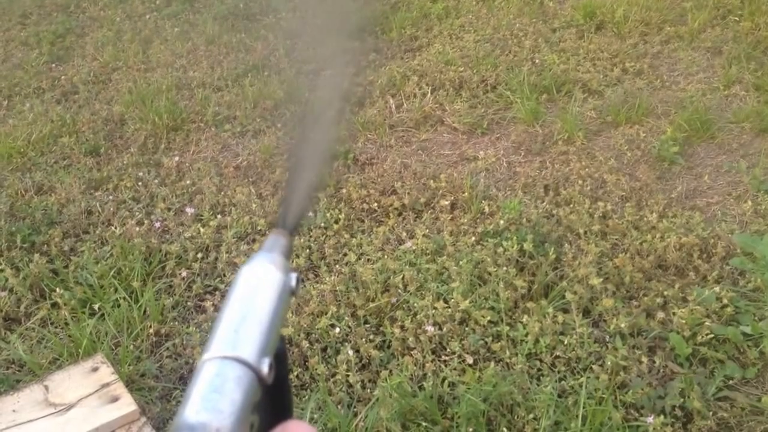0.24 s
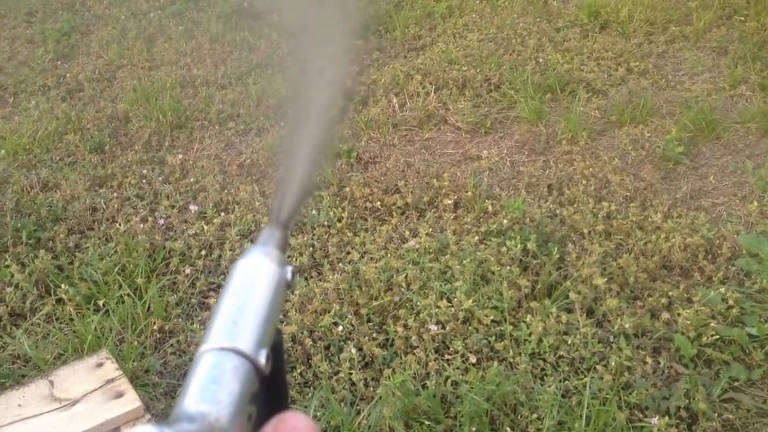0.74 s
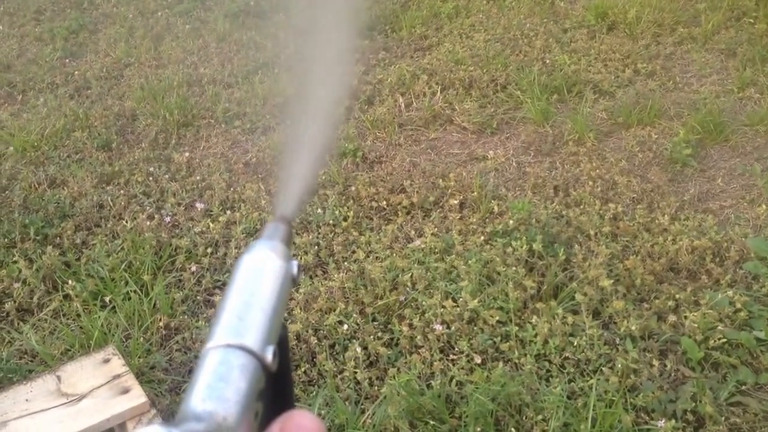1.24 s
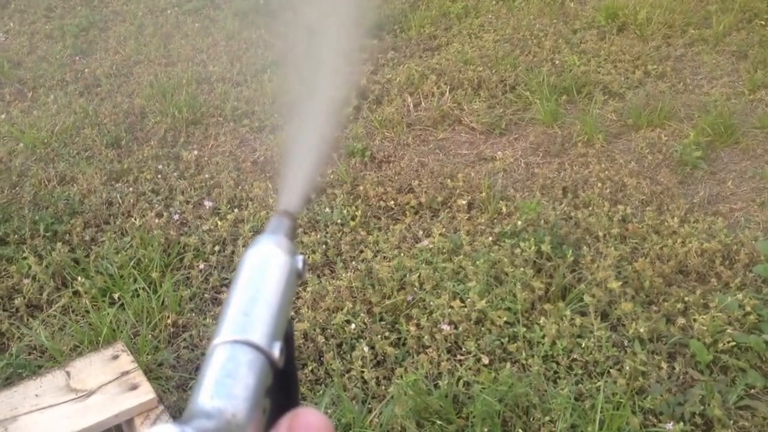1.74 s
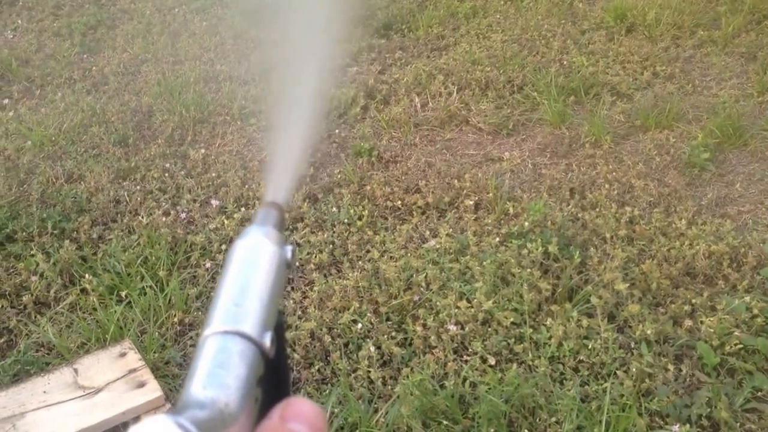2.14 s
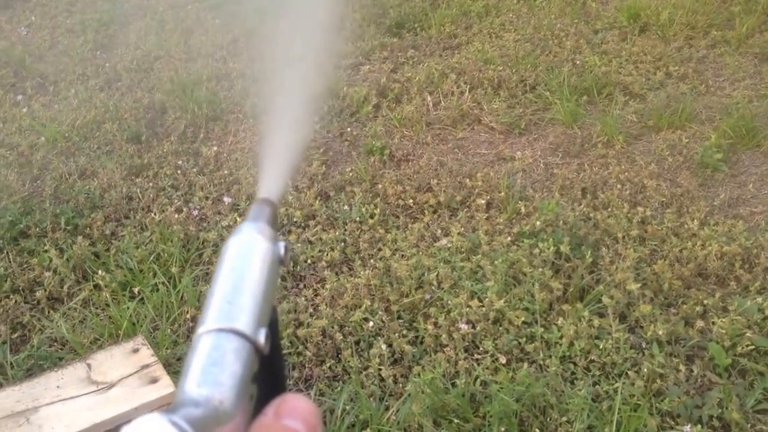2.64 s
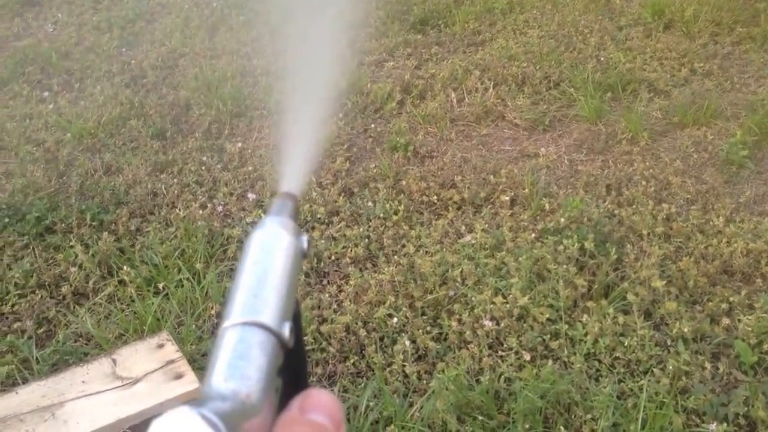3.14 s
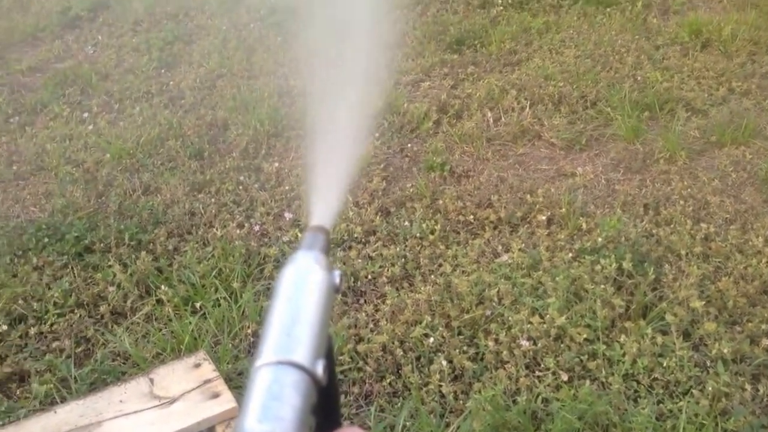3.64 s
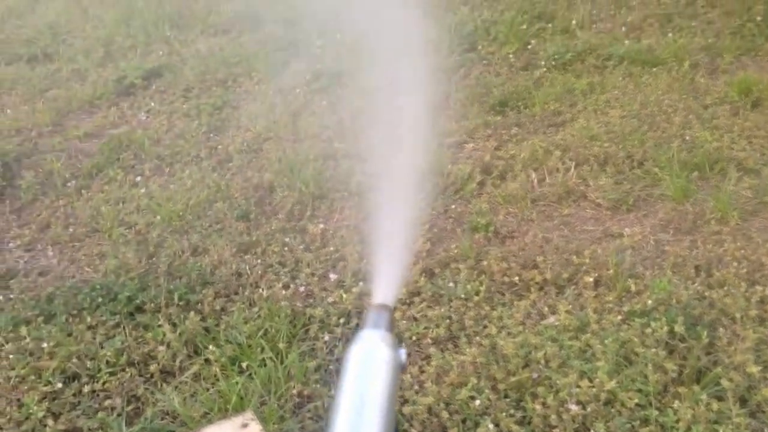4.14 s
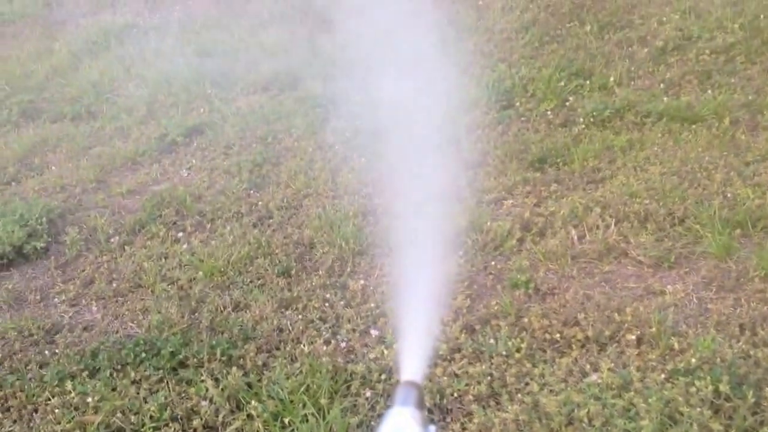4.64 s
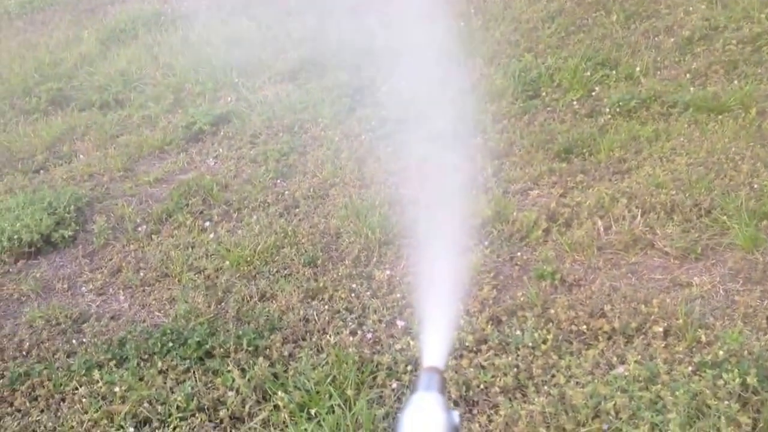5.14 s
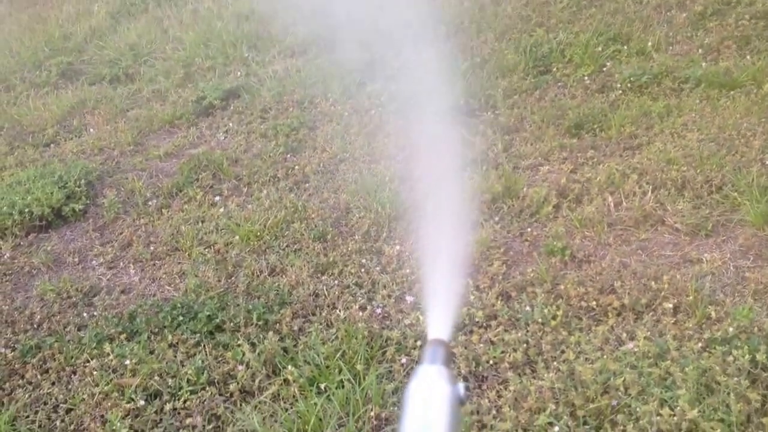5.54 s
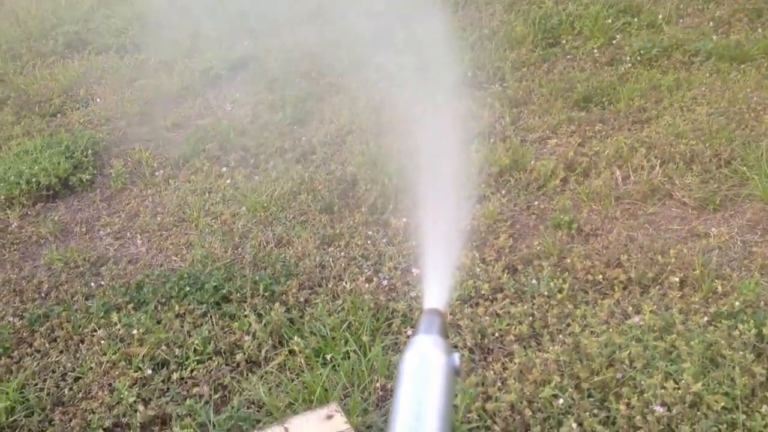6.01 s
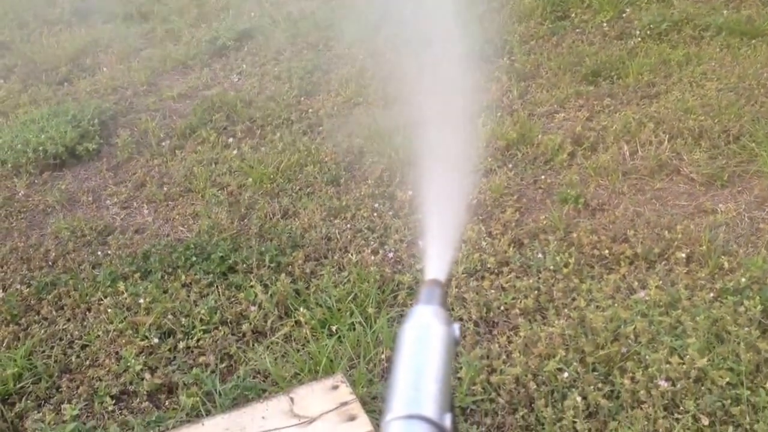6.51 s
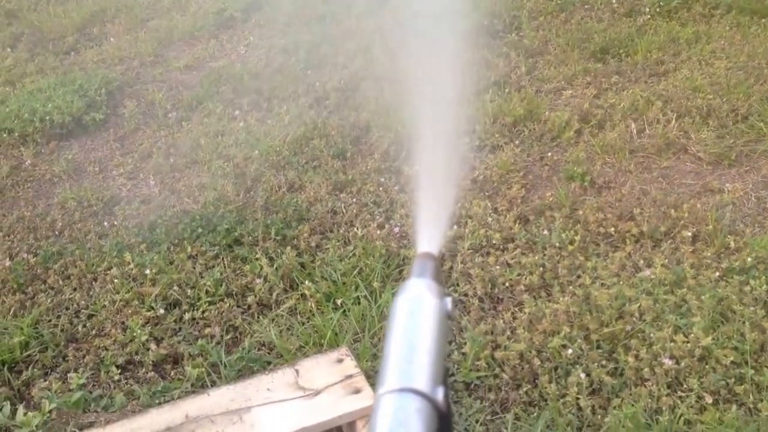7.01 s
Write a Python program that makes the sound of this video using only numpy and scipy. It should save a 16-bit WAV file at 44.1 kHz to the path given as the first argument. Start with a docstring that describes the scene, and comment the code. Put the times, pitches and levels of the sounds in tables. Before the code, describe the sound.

A hand-held spray gun blasts compressed air and water over a lawn, close to the microphone. The loud, bright hiss runs without a break, carrying a fuzzy high whistle, a softer rushing roar and a fine sputter. Small gulps of water pop out now and then, mostly in the first half. The tone shifts slightly midway as the gun moves forward, and faint puffs of air bump the microphone.

```python
"""On a lawn, close to the microphone, a hand-held spray gun blasts compressed air and soapy water. One uneven
flow builds up and sags again. It drives the hiss and roar of swirling air, a fuzzy nozzle whistle and the
sputter of torn-up water, while bigger blobs of water leave with a gulp. Echoes off nearby surfaces colour the
sound and change as the gun is pushed forward. Stray air bumps the microphone. Under it all lies the jet's
faint, steady low rumble."""
import sys
import numpy as np
from scipy import signal
from scipy.fft import irfft, next_fast_len
from scipy.io import wavfile
from scipy.ndimage import map_coordinates

SR = 44100
rng = np.random.default_rng(int(sys.argv[2]) if len(sys.argv) > 2 else 0)


def wav_record(signal):
    """Record a signal, one row per channel, as 16-bit PCM in the file named by sys.argv[1]."""
    frames = np.transpose(np.atleast_2d(signal))
    bounded = np.clip(frames, -1, 1)
    # unit amplitude maps onto the largest positive 16-bit level
    quanta = np.round(bounded * 32767).astype(np.int16)
    wavfile.write(sys.argv[1], SR, quanta)


N = 320607
TIME = np.arange(N) / SR

# The flow through the nozzle builds slowly and sags quickly: t/s, level/dB
JET_FLOW = [(0.0, -17.5), (0.14, -17), (0.34, -18.5), (1.28, -16.9), (1.32, -18.5), (1.82, -18.0),
            (1.92, -17.5), (2.02, -18.5), (2.32, -16.5), (2.76, -18.5), (2.98, -16.5), (3.1, -18),
            (3.86, -17), (3.92, -20), (4.02, -18.5), (4.74, -17.6), (4.86, -19), (5.64, -17.0), (5.82, -19),
            (6.02, -17), (6.12, -20.5), (6.34, -18), (7.18, -17.5), (7.26, -18.5)]
# The nozzle whistle: t/s, f/Hz, level/dB compared with the flow
WHISTLE_NOTE = [(0, 5960, -8.5), (1.6, 5940, -8), (2.15, 6000, -7), (3.3, 5940, -5.5), (3.9, 5920, -7),
                (4.4, 5920, -8), (6.0, 5930, -8), (6.5, 5850, -9.5), (6.8, 5730, -8.5), (7.27, 5630, -8)]
# How far the gun is pushed forward: t/s, reach (0 = near, 1 = forward)
ARM_REACH = [(0, 0.13), (1.7, 0.21), (3.3, 0.3), (3.8, 0.27), (4.3, 0.7), (4.9, 1), (5.8, 0.8),
             (7.27, 0.75)]
# The tone of each sound, from bass to treble: f/Hz, relative level/dB
HISS_SPECTRUM = [(400, -61.5), (1200, -15), (3000, -15.5), (3700, -10), (4400, -5), (5000, -2),
                 (6000, -1.5), (7500, 0.76), (9500, -3.5), (11300, -2.5), (12400, 0), (13200, -0.9),
                 (14300, -1.5), (15300, -7.5)]  # tiny swirls of air
ROAR_SPECTRUM = [(60, -33), (250, -20.5), (360, -21), (480, -18.5), (600, -17), (730, -4.5), (1050, 1.5),
                 (1600, 1.5), (2500, 1.5), (4000, -4), (8000, -44)]  # larger swirls
SPIT_SPECTRUM = [(100, -38), (300, -24), (480, -3.5), (700, 0), (1100, 3.5), (2000, -6), (4000, -12.5),
                 (9000, -22), (15000, -44)]  # one bit of water
GULP_SPECTRUM = [(100, -34), (280, -27), (430, 0), (600, 5), (1000, -5), (2000, -10.5), (4000, -14),
                 (9000, -27), (15000, -32)]  # one blob of water
PUFF_SPECTRUM = [(20, -26), (50, -11), (90, -4), (170, -3), (250, -5.5), (360, -19), (900, -45)]  # air hitting the microphone
RUMBLE_SPECTRUM = [(20, -30), (40, -12), (62, 4), (90, 2.5), (160, -0.5), (270, 7), (400, -10), (800, -24)]  # the jet's low rumble
# The largest blobs of water: t/s, relative peak level/dB
BIG_BLOBS = [(0.243, -16), (0.254, -14), (0.549, -22), (0.762, -16), (0.926, -11.5), (1.075, -15),
             (1.527, -17), (1.707, -16), (2.388, -13.5), (3.296, -14.5), (3.591, -16), (3.836, -14),
             (5.53, -17), (5.827, -19), (5.846, -17)]
# The echo off the holder's body drifts as the hand moves: t/s, delay/ms
BODY_ECHO_DELAY = [(0, 2.974), (.9, 2.97), (1.9, 3.022), (3.9, 3.052), (5.4, 3.02), (7.27, 3.044)]
# Bands the gun's body lifts or dims: f/Hz, width/Hz, level/dB when near, level/dB when forward
GUN_BANDS = [(792, 116, 5.5, 4.5), (1047, 55, 4, 4), (1540, 66, 4, -1.5), (1804, 44, 9, -7),
             (1890, 31, -25, 4), (2007, 38, 1.5, 9), (2350, 49, 8.5, 8), (2402, 70, -8, -4.5),
             (2545, 73, 0.5, 7), (2686, 42, 5.5, 5.5), (2930, 150, -6, 6), (3150, 61, 4.5, -0.5),
             (3470, 49, 2, 1), (3785, 86, 6, -7.5), (4230, 170, 3.5, -2.5), (4620, 31, -2, 8.5),
             (13350, 480, 4, 3), (15100, 400, 3.5, 7.5)]
# Puffs of air on the microphone: t/s, level/dB, fade time/s, pitch factor
AIR_PUFFS = [(0.997, -39.5, .014, 1), (1.042, -43, .017, 1.1), (1.144, -48, .02, 1.1), (1.27, -56, .07, .7),
             (2.358, -46, 0.048, .85), (2.62, -46, .021, 0.75), (3.879, -45, 0.038, 1.5),
             (5.29, -47, .034, 0.63), (5.396, -53, .04, .6), (5.86, -59, .28, .52),
             (6.384, -38, .029, 1.17), (6.678, -38, .017, 0.86)]


def hiss(jet_db, flutter, trim_db=1.0, flutter_db=0.48):
    """Tiny swirls of air hiss at the nozzle, fluttering a little with the water in the stream."""
    return noise(HISS_SPECTRUM) * gain_of(jet_db + trim_db + flutter_db * flutter)


def whistle(jet_db, width_hz=330, jitter_hz=40, gap_hz=240, upper_db=-1.0):
    """Air sings two close notes at the nozzle's lip; passing water keeps shaking their pitch."""
    hz, strength_db = follow(WHISTLE_NOTE)
    hz = hz + jitter_hz * wander(rate_hz=140)
    notes = np.zeros(N)
    for note_hz, note_db in ((hz, 0), (hz + gap_hz, upper_db)):
        ringing = resonate(rng.standard_normal(N), note_hz, width_hz)
        notes += gain_of(note_db) * resonate(ringing, note_hz, width_hz)  # twice, for a purer note
    return unit_level(notes) * gain_of(jet_db + strength_db)


def roar(jet_db, flutter, trim_db=-16.0, flutter_db=0.72, billow_db=0.26, forward_db=0.2):
    """Larger swirls roar further out in the spray, which billows by itself."""
    reach, = follow(ARM_REACH)
    wobble_db = flutter_db * flutter + billow_db * wander(rate_hz=9.6)
    return noise(ROAR_SPECTRUM) * gain_of(jet_db + trim_db + wobble_db + forward_db * reach)


def sputter(jet_db, flutter, per_s=330, spread_db=3.5, trim_db=-18.5, clumping=.15, forward_db=-1.5):
    """Each bit of water torn apart by the air makes a sharp spike of pressure."""
    reach, = follow(ARM_REACH)
    pulse = impulse(SPIT_SPECTRUM, one_sided=.2)
    chance = per_s / SR * np.exp(clumping * flutter)
    sizes = gain_of(spread_db * np.minimum(rng.exponential(1, N), 2.5))
    hits = sizes * (rng.random(N) < chance)
    spits = signal.oaconvolve(hits, pulse, "same")
    return unit_level(spits) * gain_of(jet_db + trim_db + forward_db * reach)


def gulps(trim_db=-1.0, small_per_s=5, small_db=-19, spread_db=1.5, forward_db=-3):
    """Blobs of water take longer to leave the nozzle, so they sound deeper; small ones come at random."""
    reach, = follow(ARM_REACH)
    pulse = impulse(GULP_SPECTRUM, one_sided=.2)
    small_blobs = rng.random(N) < small_per_s / SR
    hits = small_blobs * gain_of(small_db + spread_db * rng.uniform(-1, 1, N) + forward_db * reach)
    for time_s, peak_db in BIG_BLOBS:
        add(hits, time_s, gain_of([peak_db]))
    return gain_of(trim_db) * signal.oaconvolve(hits, pulse / pulse.max(), "same")


def nearby_echoes(jet):
    """Quick echoes off the holder and the gun boost some pitches and weaken others as the arm moves."""
    reach, = follow(ARM_REACH)
    body_ms, = follow(BODY_ECHO_DELAY)
    near = 0.16 * echo(jet, body_ms, dull_hz=9000)
    off_gun = 0.17 * echo(jet, delay_ms=1.52, dull_hz=5000)
    forward = 0.17 * echo(jet, body_ms, dull_hz=3800) + off_gun
    return jet + (1 - reach) * near + reach * forward


def gun_shading(jet):
    """The gun's body lifts or dims bands of the sound, depending on how far the arm reaches."""
    hz, t, spectra = signal.stft(jet, SR, nperseg=1024)
    reach, = follow(ARM_REACH)
    reach = np.interp(t, TIME, reach)
    shade_db = 0
    for centre_hz, width_hz, near_db, forward_db in GUN_BANDS:
        band = np.exp(-((hz - centre_hz) / width_hz) ** 2)
        shade_db += np.outer(band, near_db + (forward_db - near_db) * reach)
    return signal.istft(spectra * gain_of(shade_db), SR, nperseg=1024)[1][:N]


def air_puffs():
    """Brief puffs of air bump the microphone; faster puffs sound higher."""
    mix = np.zeros(N)
    t = np.arange(SR // 2) / SR - 1 / 4  # half a second, centred on the puff
    for time_s, db, fade_s, pitch in AIR_PUFFS:
        pulse = impulse(np.multiply(PUFF_SPECTRUM, [pitch, 1]))
        swirls = signal.oaconvolve(rng.standard_normal(len(t)), pulse, "same")
        swell = np.exp(-2 * (t / fade_s) ** 2)
        puff = unit_level(swirls * swell) * np.sqrt(np.mean(swell ** 2))
        add(mix, time_s + t[0], gain_of(db) * puff)
    return mix


def jet_rumble(level_db=-61.0, drift_db=2.0):
    """The jet's faint low rumble; its level wavers a little."""
    return noise(RUMBLE_SPECTRUM) * gain_of(level_db + drift_db * wander(rate_hz=6.6))


def gain_of(db):
    """Turns decibels into a number to multiply a sound by."""
    return 10 ** (np.asarray(db) / 20)


def unit_level(x):
    """Scales a signal so that its average size (rms) is 1."""
    return x / np.sqrt(np.mean(x ** 2) + 1e-20)


def follow(table):
    """Joins a table's points in time with straight lines, giving one curve per value column."""
    times, *columns = np.transpose(table)
    return [np.interp(TIME, times, column) for column in columns]


def add(mix, start_s, sound):
    """Lays a sound into the mix at the given time."""
    part = mix[max(round(start_s * SR), 0):][:len(sound)]
    part += sound[:len(part)]


def impulse(spectrum, one_sided=1, size=4096):
    """A centred click with this spectrum; one_sided runs from symmetric (0) to a sudden start (1)."""
    points_hz, db = np.transpose(spectrum)
    hz = abs(np.fft.fftfreq(size, 1 / SR))
    curve_db = np.interp(np.log(hz + 1), np.log(points_hz + 1), db)
    log_gain = np.log(gain_of(curve_db))
    phase = -one_sided * signal.hilbert(log_gain).imag
    return np.fft.fftshift(np.fft.ifft(np.exp(log_gain + 1j * phase)).real)


def noise(spectrum):
    """Steady noise of average size 1 with the given spectrum."""
    return unit_level(signal.oaconvolve(rng.standard_normal(N), impulse(spectrum), "same"))


def wander(rate_hz):
    """A random drift of average size 1, mostly slower than rate_hz."""
    hz = np.fft.rfftfreq(2 * N, 1 / SR)[:N // 8]
    waves = rng.standard_normal((len(hz), 2)) @ [1, 1j]
    slow_waves = waves / (1 + (hz / rate_hz) ** 2)
    return unit_level(irfft(slow_waves, next_fast_len(2 * N))[:N])


def resonate(x, hz, width_hz):
    """Makes a sound ring at a pitch that follows the curve hz."""
    turn = np.exp(2j * np.pi * np.cumsum(hz) / SR)
    decay = np.exp(-np.pi * width_hz / SR)
    return 2 * (turn * signal.lfilter([1 - decay], [1, -decay], x / turn)).real


def echo(x, delay_ms, dull_hz):
    """A late copy of a sound that has lost treble above dull_hz."""
    pole = np.exp(-2 * np.pi * dull_hz / SR)
    dulled = signal.filtfilt([1 - pole], [1, -pole], x)
    return map_coordinates(dulled, [(TIME - delay_ms / 1000) * SR], order=3)


def scene(surge_db=0.41):
    """One uneven flow, with small surges and a fast flutter, shakes the jet; both channels are alike."""
    flow_db, = follow(JET_FLOW)
    jet_db = flow_db + surge_db * wander(rate_hz=9)
    flutter = wander(rate_hz=44.7)
    air = hiss(jet_db, flutter) + whistle(jet_db) + roar(jet_db, flutter)
    water = sputter(jet_db, flutter) + gulps()
    mono = gun_shading(nearby_echoes(air + water)) + jet_rumble() + air_puffs()
    return np.array([mono, mono])


def record(dry):
    """Cuts off the very highest treble steeply."""
    lowpass = signal.firwin(2047, cutoff=15330, window=("kaiser", 9), fs=SR)
    return signal.oaconvolve(dry, lowpass[None], "same")


dry = scene()
out = record(dry)
wav_record(out)
```